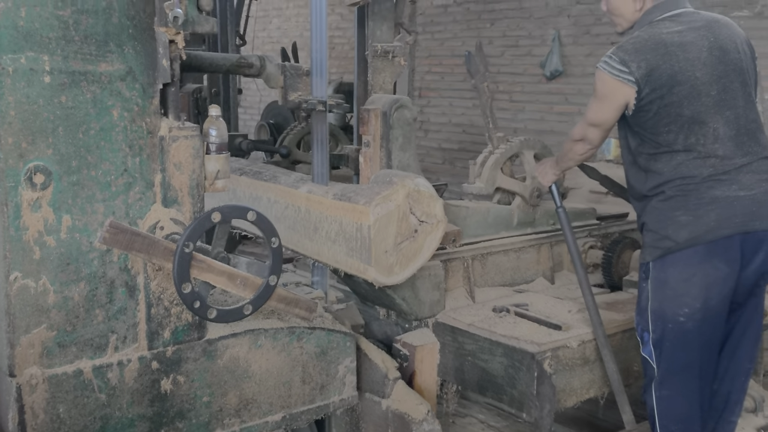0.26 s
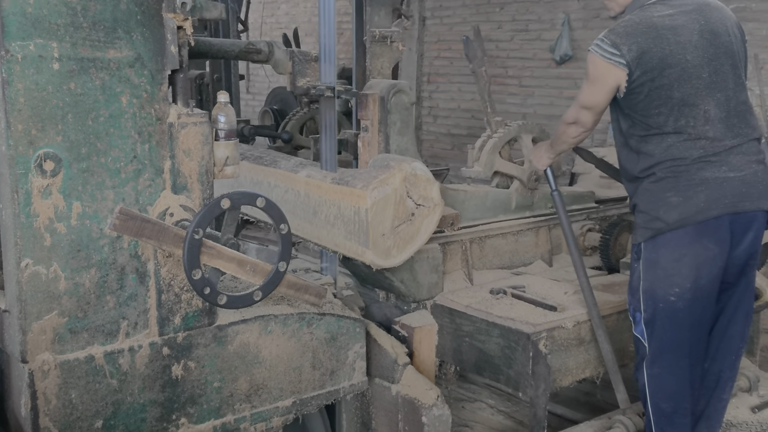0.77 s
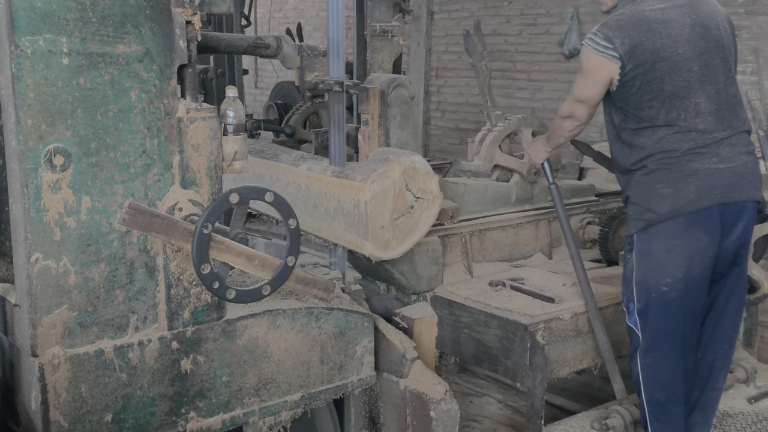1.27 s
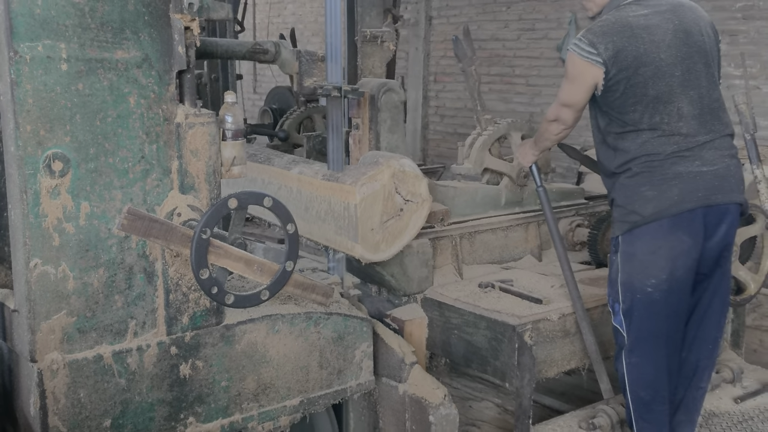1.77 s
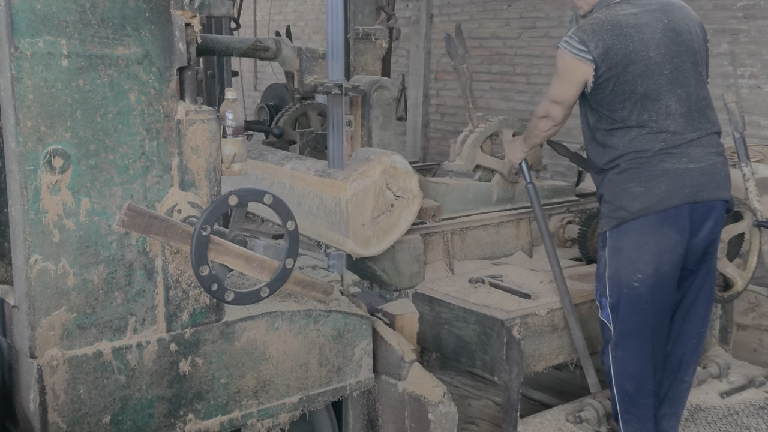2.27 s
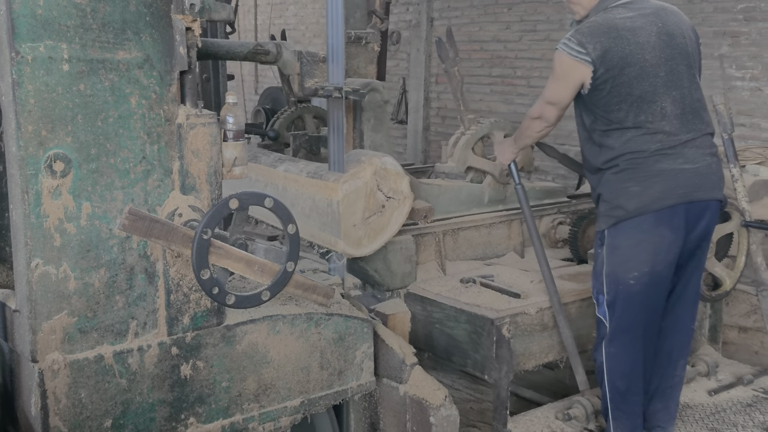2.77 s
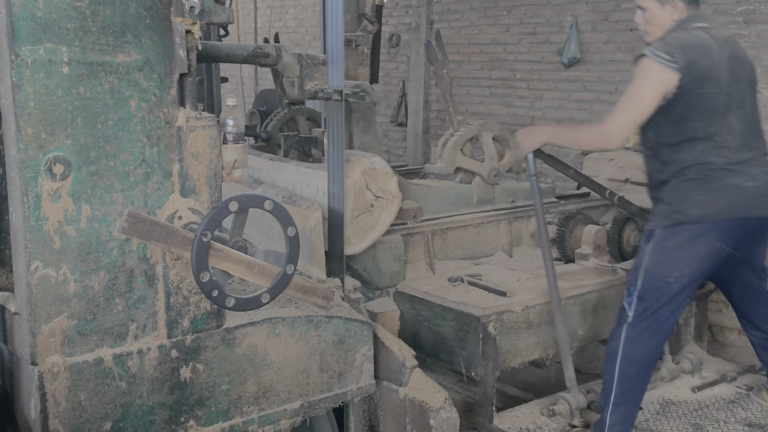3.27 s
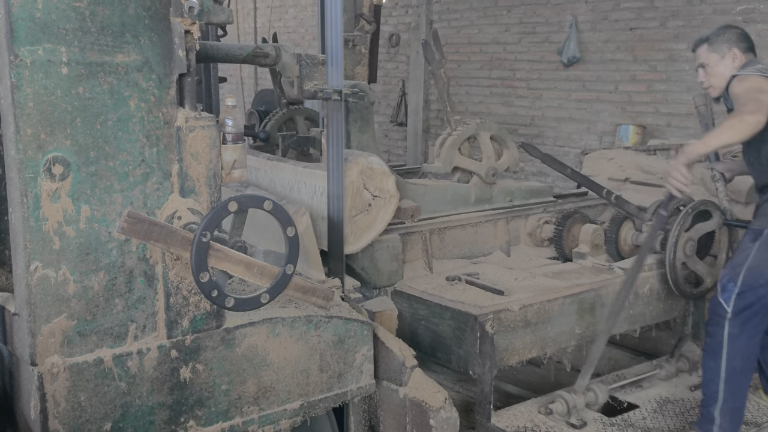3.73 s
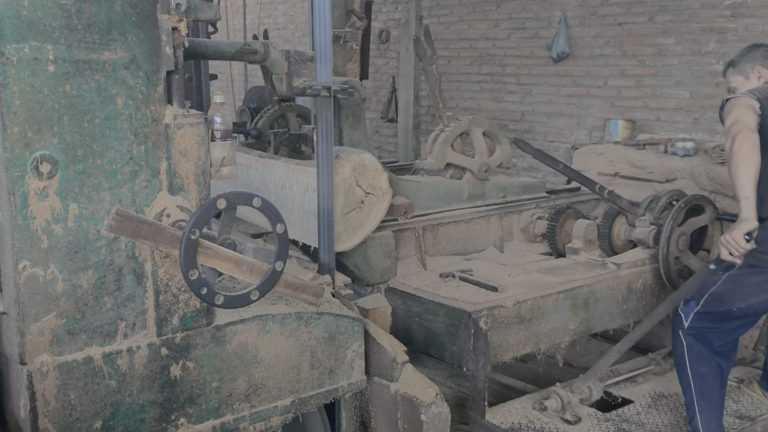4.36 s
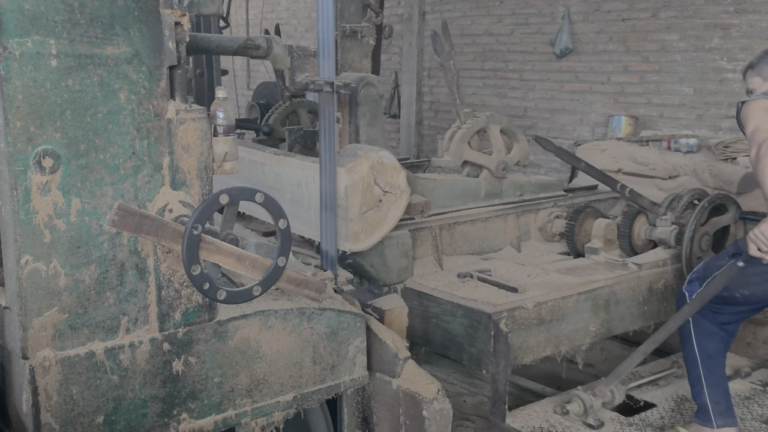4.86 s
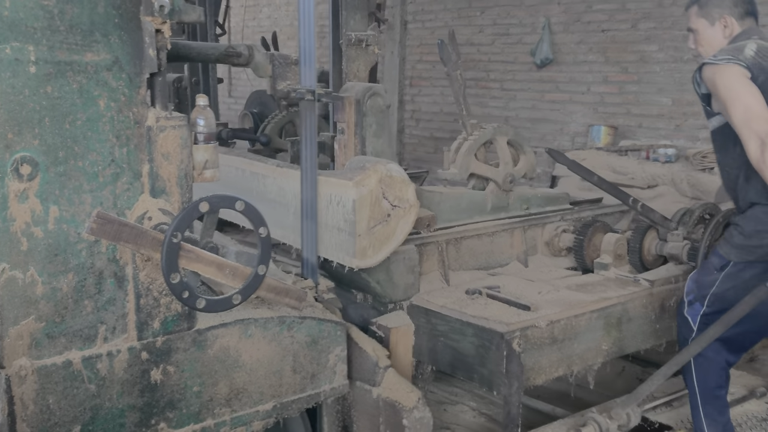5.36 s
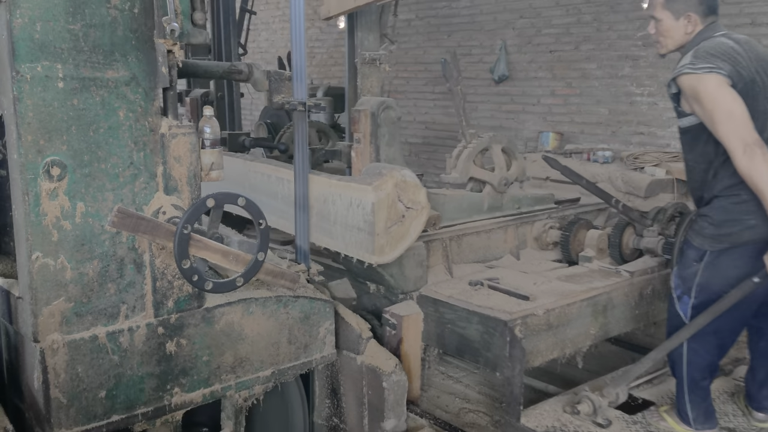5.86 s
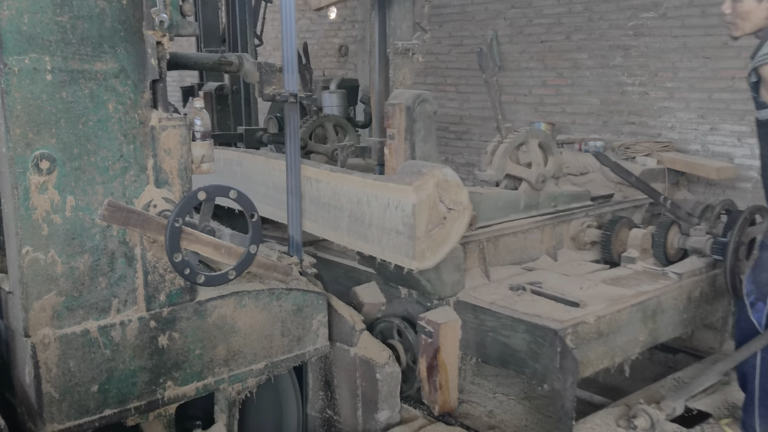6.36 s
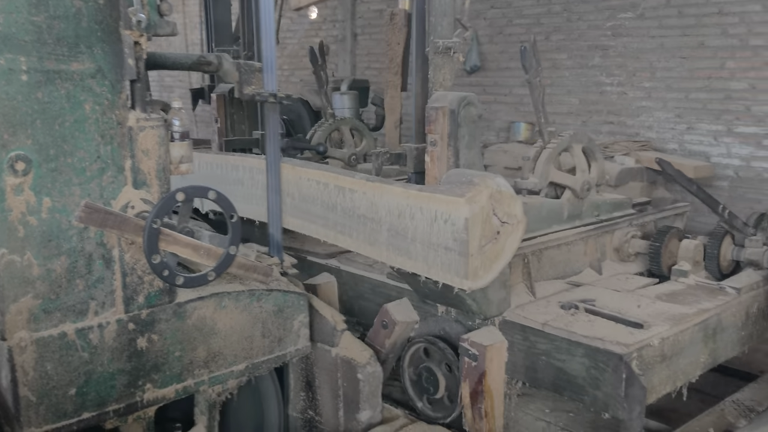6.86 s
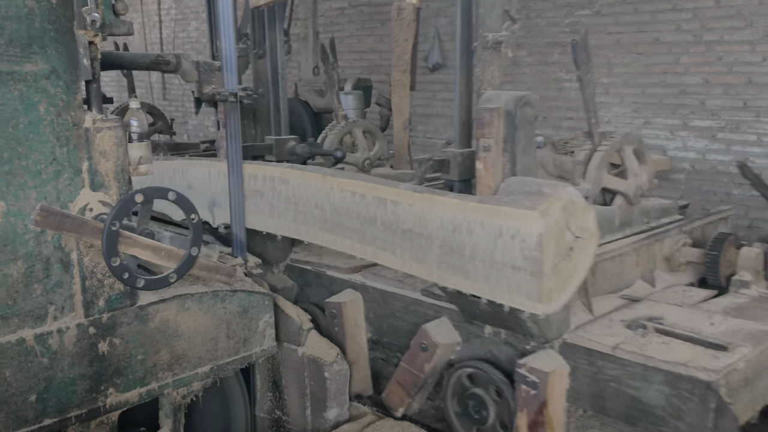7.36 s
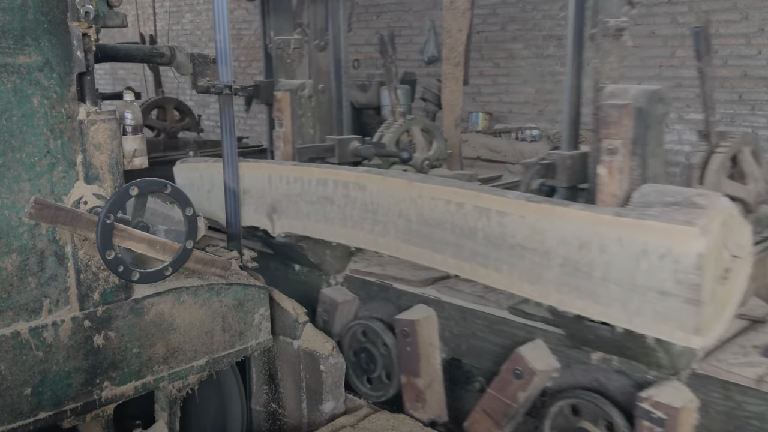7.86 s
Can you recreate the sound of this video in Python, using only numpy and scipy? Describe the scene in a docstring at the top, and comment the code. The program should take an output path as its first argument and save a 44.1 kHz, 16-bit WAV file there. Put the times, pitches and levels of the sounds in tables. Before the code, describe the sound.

A large band saw runs throughout in a brick shed, with a low diesel engine drone and a steady roar from its frame and belts. For the first 3 seconds it cuts a log: the teeth make a bright, slightly pulsing hiss, and the blade sings in high, throbbing bursts around 0.5 seconds and again from 1.5 to 3 seconds. At 3 seconds the hiss and tooth tones stop abruptly. The heavy hum eases and the unloaded engine gradually rises in pitch. From there to the end, at about 8 seconds, the free blade gives a stronger metallic ring and a high rustle, swishing lightly about three times a second as its joint brushes the guides. Near 7.8 seconds comes one short rising squeak. The sound is softly overloaded and sits entirely in the right channel, with the left practically silent.

```python
"""A band saw rips a log in a brick shed. Its six-cylinder diesel drones under load, frame and belts roar,
and the teeth tear off chips with a hiss, their harmonics singing out on blade resonances.
At 3 s the blade leaves the wood: hiss and tooth tones stop, the unloaded engine speeds up, and the free
blade rings and rustles, its joint brushing the guides once a loop. Near 7.8 s comes a rising squeak.
Throughout, the microphone softly overloads the right input; the left holds only faint circuit noise."""
import sys
import numpy as np
from scipy import signal
from scipy.fft import rfft, irfft
from scipy.io import wavfile

SR = 44100
rng = np.random.default_rng(int(sys.argv[2]) if len(sys.argv) > 2 else 0)


def unload_audio(sound):
    """Save the sound as a 16-bit wav file, at the path given as the first command line argument."""
    columns = np.transpose(np.atleast_2d(sound))
    # keep every value between -1 and 1, then stretch to whole-number steps
    steps = np.round(np.clip(columns, -1, 1) * 32767)
    wavfile.write(sys.argv[1], SR, steps.astype(np.int16))


N = 357210
TIME = np.arange(N) / SR
FREE_S = 3.005  # the blade leaves the wood
SAG_S = 0.5  # time constant of the early sag in hiss and rustle

def from_db(db):
    """Level to amplitude ratio."""
    return 10 ** (np.asarray(db) / 20)

def rms_one(x):
    """Normalisation to rms 1."""
    return x / np.sqrt(np.mean(x ** 2) + 1e-20)

def coloured(x, spectrum, outside_db):
    """Spectral weighting, interpolated over log frequency."""
    hz, db = np.transpose(spectrum)
    log_hz = np.log(np.maximum(np.arange(N // 2 + 1) * SR / N, 1))
    return irfft(rfft(x) * from_db(np.interp(log_hz, np.log(hz), db, outside_db, outside_db)), N)

def noise(spectrum):
    """Filtered white noise, rms 1."""
    return rms_one(coloured(rng.standard_normal(N), spectrum, -90))

def drift(corner_hz):
    """Random modulation: low-passed noise of rms 1, drawn every 40th sample."""
    pole = np.exp(-2 * np.pi * corner_hz * 40 / SR)
    slow = signal.lfilter([1], [1, -2 * pole, pole * pole], rng.standard_normal(N // 40 + 2002))[2000:]
    return np.interp(np.arange(N) / 40, np.arange(len(slow)), rms_one(slow))

def tone(cycles, waver_db, waver_hz):
    """Random amplitude modulation of a sine of rms 1."""
    return np.sqrt(2) * np.sin(2 * np.pi * (cycles + rng.random())) * from_db(waver_db * drift(waver_hz))

def unloading(over_s):
    """Linear ramp from 0 to 1 once the blade is free."""
    return np.clip((TIME - FREE_S) / over_s, 0, 1)

def settling(tau_s):
    """Exponential relaxation from 0 toward 1 once the blade is free."""
    return 1 - np.exp(-np.maximum(TIME - FREE_S, 0) / tau_s)

# Response of exhaust pipe and shed: (frequency [Hz], level [dB])
EXHAUST_RESPONSE = [(42.5, -33.5), (44.5, -33), (48, -29.5), (51, -28.5), (85, -24.5), (87.5, -24),
                    (89.5, -27), (93, -31), (98, -33.5), (103, -36), (128, -37.5), (134, -36), (142, -43.5),
                    (154, -38), (171, -44), (181, -37), (190, -38.5), (198, -35.5), (205, -38)]
# Tones of unequal cylinders and a driven shaft: (order [per engine cycle], loaded [dB], free [dB])
WEAK_ORDERS = [(7, -49, -44), (8.5, -46, -60), (10, -53, -42), (11, -46, -50), (13, -52, -42),
               (19, -46, -50), (23, -45, -50), (30, -47, -43), (36, -45, -45)]

def engine(loaded_hz=42.68, free_hz=52.4):
    """Periodic firing gives a harmonic series, which rises in pitch as the load comes off."""
    firing_hz = loaded_hz + (free_hz - loaded_hz) * settling(2.4)
    firings = np.cumsum(firing_hz) / SR
    hz, db = np.transpose(EXHAUST_RESPONSE)
    exhaust = sum(from_db(np.interp(k * firing_hz, hz, db)) * tone(k * firings, .75 + .3 * k, waver_hz=4)
                  for k in (1, 2, 3, 4))
    free, cycles = unloading(1.2), firings / 6
    weak = sum(from_db(loaded_db + free * (free_db - loaded_db)) * tone(k * cycles, 3.5, waver_hz=1.5)
               for k, loaded_db, free_db in WEAK_ORDERS)
    return exhaust + weak

# Noise spectra of the moving parts: (frequency [Hz], relative density [dB])
FRAME_ROAR = [(18, -22), (35, -27), (60, -9), (70, -13.5), (100, -8), (124, -8.5), (300, -9), (510, -9),
              (600, -9.5), (720, -9), (760, -34)]
BELT_ROAR = [(700, -25), (740, -2.5), (775, -0.5), (1000, -1.5), (1150, -2.5), (1500, -4.5), (1770, -5.5),
             (1900, -5), (2470, -24)]
BLADE_RING = [(940, -44), (1600, -7.5), (1770, -6), (2210, -0.5), (2300, -2), (2500, -1.5), (3090, -6),
              (3500, -21), (4550, -35), (7700, -120)]
GUIDE_RUSTLE = [(3000, -49), (3300, 0), (3800, -1), (4060, -2.5), (4120, 2), (4400, 1), (5500, 0.5),
                (6400, -5.5), (6700, -5), (9500, -14.5), (12500, -12), (16000, -15)]
# Their levels, in that order: (in the wood [dB], just out [dB], settled [dB], time constant [s])
GEAR_LEVELS = [(-25.5, -24, -27, 1.8), (-20.5, -19, -22, 2.7), (-22, -21, -18.5, 0.31),
               (-27, -29, -23.5, 1.1)]

def running_gear():
    """Random vibration and friction: frame and belts roar, the blade rings and rustles in its guides."""
    frame_db, belts_db, ring_db, rustle_db = (
        wood_db + unloading(.06) * (out_db - wood_db) + settling(tau_s) * (settled_db - out_db)
        for wood_db, out_db, settled_db, tau_s in GEAR_LEVELS)
    rustle = from_db(rustle_db + 1.3 * np.exp(-TIME / SAG_S)) * joint_brushing(noise(GUIDE_RUSTLE))
    frame = from_db(frame_db + .54 * drift(5.3)) * noise(FRAME_ROAR)
    belts = from_db(belts_db + .46 * drift(11)) * noise(BELT_ROAR)
    ring = from_db(ring_db + .6 * drift(7)) * noise(BLADE_RING)
    return frame + belts + ring + rustle

# Modes of blade and frame: (frequency [Hz], bandwidth per stage [Hz], in the wood [dB], free [dB])
MODES = [(595.6, 18, -38.5, -45), (751, 18, -40.5, -42.5), (798, 77, -46, -38), (957, 33, -45, -42),
         (1078.5, 33, -33, -38.5), (1139, 19, -37.5, -47), (1418, 28, -40, -35), (1594, 35, -44, -38.5),
         (2019, 47, -40, -31), (2151, 25, -35.5, -30.5), (2198, 50, -39, -30), (2418, 48, -32, -34),
         (2485, 43, -48, -35), (2628, 33, -36, -33.5), (3055, 43, -44, -36.5), (3215, 32, -52, -41),
         (4130, 70, -50, -38.5), (6620, 80, -45, -61)]

def resonances():
    """Forced resonance: noise drives two-stage resonators; the wood damps some modes and feeds others."""
    free = settling(.2)
    out = 0
    for hz, width_hz, wood_db, free_db in MODES:
        radius = np.exp(-np.pi * width_hz / SR)
        stage = [1, 0, -1, 1, -2 * radius * np.cos(2 * np.pi * hz / SR), radius * radius]
        gain = from_db(wood_db + free * (free_db - wood_db) + .8 * drift(5))
        out += gain * rms_one(signal.sosfilt([stage, stage], rng.standard_normal(N)))
    return out

# Chips tearing off: (frequency [Hz], relative density [dB])
CHIP_HISS = [(3000, -28), (4000, -16), (6500, -5.5), (10000, -2.5), (12500, -4), (14000, 1), (15000, 0.5),
             (16000, -6)]
# Tooth tones: (harmonic number, level relative to the hiss [dB])
TOOTH_HARMONICS = [(8, -17.5), (9, -16.5), (12, -23), (13, -22), (15, -20.5), (19, -32)]

def cutting(tooth_hz=346.6, wheel_hz=5.79):
    """Random fracture gives hiss; periodic tooth impacts give harmonics that waver with the grain."""
    wheel_angle = 2 * np.pi * wheel_hz * (TIME - .057)
    bite_db = 1.1 * np.cos(wheel_angle) + .5 * np.sin(2 * wheel_angle)  # an untrue wheel varies the bite
    sag_db = 1.5 * (1 - np.exp(-TIME / SAG_S))
    since_free_s = np.maximum(TIME - FREE_S, 0)
    ending_db = np.maximum(-522 * since_free_s, -11 - 170 * since_free_s)  # quick drop, the shed's tail
    hiss_db = -20.5 - sag_db + bite_db + ending_db
    strikes = np.cumsum(tooth_hz * (1 + .0012 * drift(3) + .003 * drift(40))) / SR
    teeth = sum(from_db(db) * tone(k * strikes, waver_db=3, waver_hz=8) for k, db in TOOTH_HARMONICS)
    singing = from_db(ending_db) * blade_singing(strikes, wheel_angle)
    hiss = from_db(.8 * drift(30)) * noise(CHIP_HISS)
    return from_db(hiss_db) * (hiss + teeth) + singing

# Bursts of singing: (start [s], duration [s], harmonic number, level before the throb [dB])
SINGING_BURSTS = [(0.417, .5, 6, -29), (1.55, 0.14, 6, -30), (1.744, .57, 7, -26.5), (1.9, .5, 6, -34),
                  (2.48, .4, 6, -32), (2.72, .28, 7, -32.5)]

def blade_singing(strikes, wheel_angle, quiet_db=-45, swell_s=.033):
    """Resonance: two tooth harmonics lie on blade modes and sing in bursts, throbbing with the wheel."""
    throb_db = 4.5 * (np.cos(wheel_angle + 2 * np.pi * .1) - .5)  # leads by a tenth of a turn
    out = 0
    for harmonic in (6, 7):
        level_db = quiet_db + throb_db
        for start_s, length_s, k, db in SINGING_BURSTS:
            if round(k) == harmonic:
                inside_s = np.minimum(TIME - start_s, start_s + length_s - TIME)
                level_db += np.clip(inside_s / swell_s + .5, 0, 1) * (db - quiet_db)
        out += from_db(level_db) * tone(harmonic * strikes, waver_db=2.5, waver_hz=25)
    return out

# Passes of the blade joint through the guides: (time [s], swell before band weighting [dB])
JOINT_PASSES = [(3.38, 6), (3.69, 8), (4.03, 6.5), (4.32, 6.5), (4.64, 5), (4.96, 5), (5.24, 2),
                (5.54, 6.5), (5.83, 5.5), (6.1, 6), (6.41, 5), (6.7, 4), (6.98, 6), (7.27, 7.5),
                (7.53, 5.5), (7.82, 3), (8.07, 3.5)]

def joint_brushing(rustle, sigma_s=.032, split_hz=8200):
    """Amplitude modulation: the rustle flickers, and swells as the joint passes, most in the treble."""
    swell_db = sum(db * np.exp(-.5 * ((TIME - at_s) / sigma_s) ** 2) for at_s, db in JOINT_PASSES)
    low = signal.sosfilt(signal.butter(8, split_hz, fs=SR, output="sos"), rustle)
    high = signal.sosfilt(signal.butter(8, split_hz, "high", fs=SR, output="sos"), rustle)
    low *= from_db(.36 * swell_db + .64 * drift(15))
    high *= from_db(.66 * swell_db + 1.2 * drift(40))
    return low + high

# Course of the squeak: (time [s], frequency [Hz], level [dB])
SQUEAK_GLIDE = [(7.77, 1650, -40), (7.8, 1880, -24), (7.83, 2040, -19.5), (7.855, 2180, -20.5),
                (7.88, 2330, -26), (7.93, 2450, -40)]

def squeak():
    """A rising glide, roughened by fast amplitude modulation."""
    times, hz, db = np.transpose([(0, 1750, -99), *SQUEAK_GLIDE, (7.95, 2300, -99)])
    cycles = np.cumsum(np.interp(TIME, times, hz)) / SR
    return from_db(np.interp(TIME, times, db)) * tone(cycles, waver_db=1.5, waver_hz=40)

def scene():
    """Superposition: all sources add in the air, alike in both channels."""
    return np.tile(engine() + running_gear() + resonances() + cutting() + squeak(), (2, 1))

# Circuit noise: (frequency [Hz], relative density [dB])
CIRCUIT_NOISE = [(20, 0), (100, -6), (300, -13), (1000, -20), (3000, -23), (5500, -30), (10000, -33),
                 (16000, -29)]
# Notch that dulls the treble near 8 kHz: (frequency [Hz], gain [dB])
TREBLE_NOTCH = [(6700, -1), (7100, -9.5), (7700, -24.5), (8300, -21), (9000, -16), (9500, -7), (10100, -2)]

def record(dry, input_db=7.5, ceiling=.9, cutoff_hz=15740):
    """Saturation rounds the peaks at right; left is circuit noise. Both are notched and low-passed."""
    driven = from_db(input_db) * dry[1]
    right = ceiling * np.tanh(driven / ceiling)
    left = from_db(-70) * noise(CIRCUIT_NOISE)
    notched = [coloured(x, TREBLE_NOTCH, outside_db=0) for x in (left, right)]
    return signal.sosfilt(signal.ellip(14, .3, 70, cutoff_hz, fs=SR, output="sos"), notched)

dry = scene()
out = record(dry)
unload_audio(out)
```